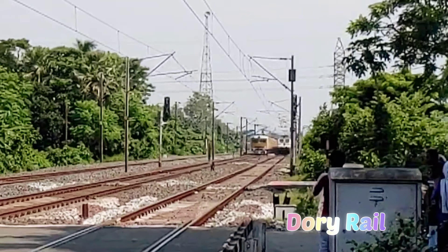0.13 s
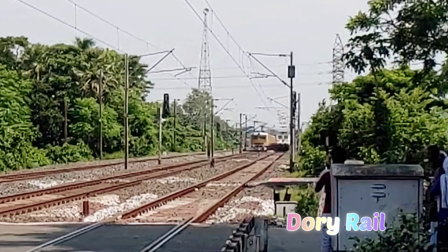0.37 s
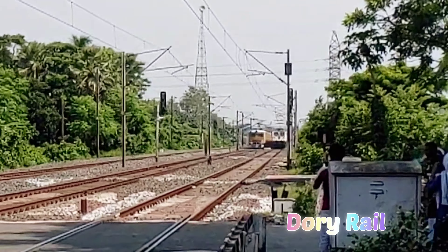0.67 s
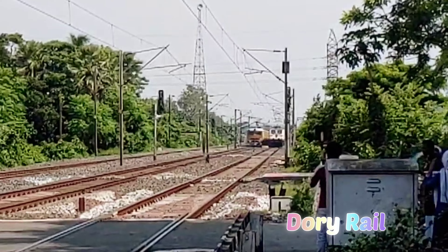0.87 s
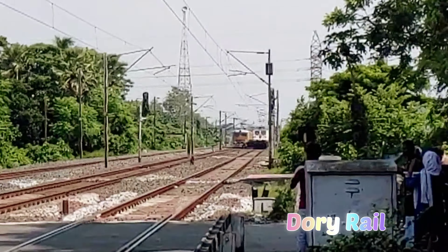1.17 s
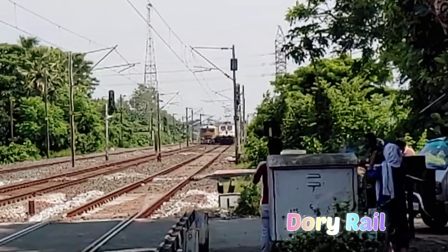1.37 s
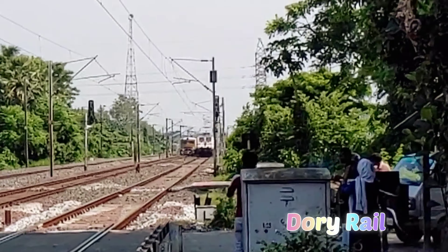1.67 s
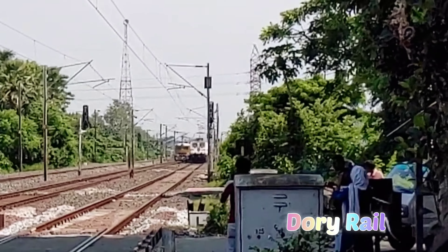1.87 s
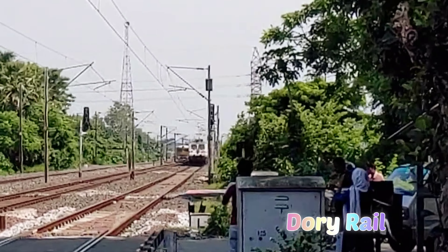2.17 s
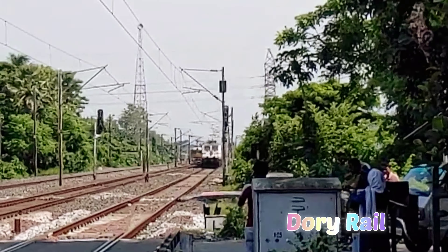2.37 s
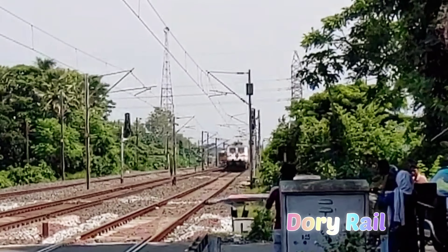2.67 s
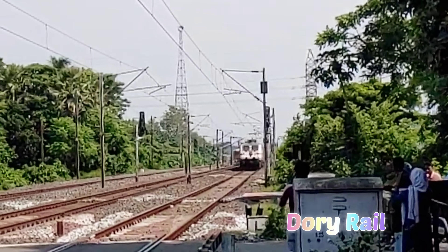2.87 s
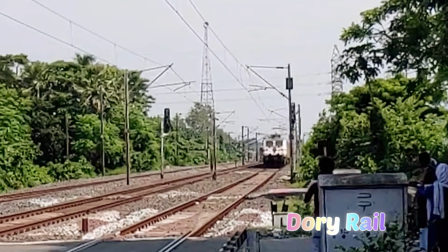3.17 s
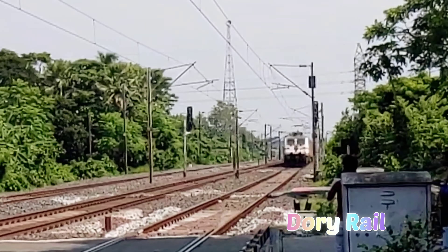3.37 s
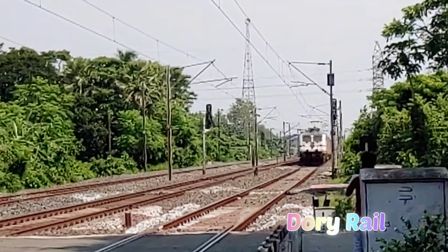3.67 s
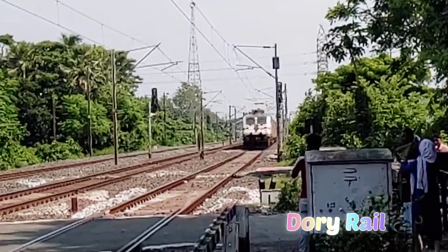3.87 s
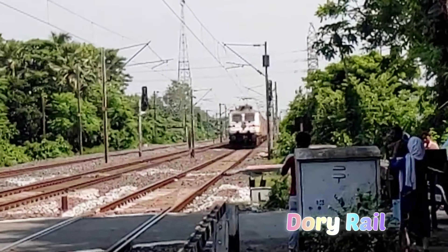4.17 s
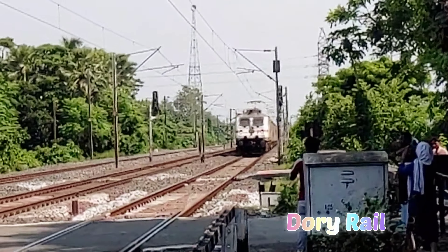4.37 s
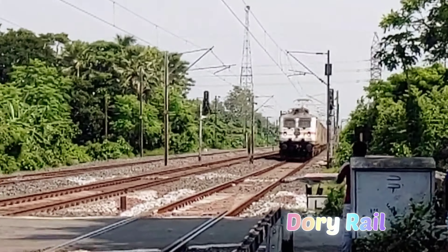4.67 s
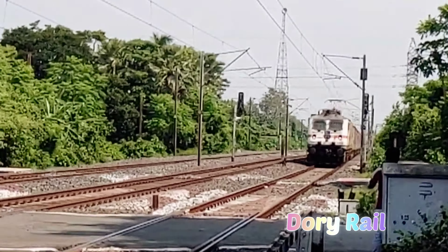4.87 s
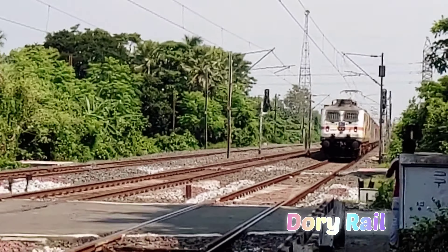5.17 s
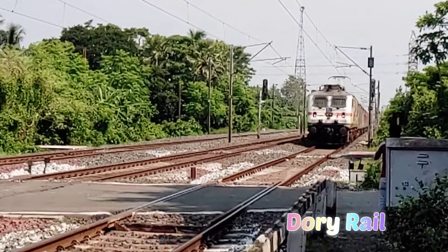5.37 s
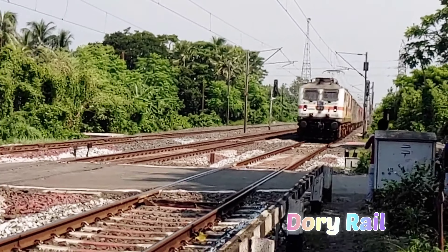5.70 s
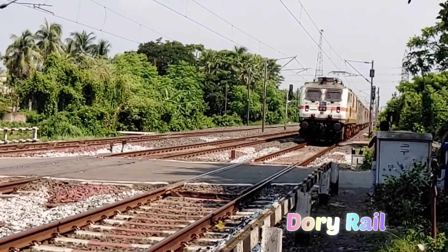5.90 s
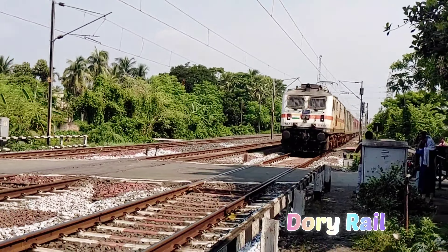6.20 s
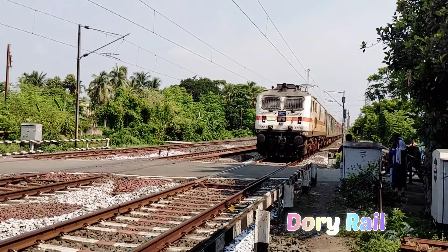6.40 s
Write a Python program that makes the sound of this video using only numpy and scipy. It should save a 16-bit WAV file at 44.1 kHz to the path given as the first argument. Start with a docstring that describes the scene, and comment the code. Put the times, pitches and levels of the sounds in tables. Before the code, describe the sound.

Outdoors by a railway crossing, wind buffets the microphone, mostly on the left, with small ticks and rustles close on the right. An approaching electric locomotive then sounds a long, loud, brassy horn blast, pauses briefly and sounds a second one. Underneath, low rumble, rolling wheels and a broad rush grow steadily as the train comes nearer.

```python
"""An electric locomotive's air horn sounds two long blasts as the train nears a level crossing.
The horn's pulse train reaches two microphone ports through unsteady air and off ballast and trees,
so its partials fade in and out. Rumble, wheel roll and rush grow over a faint far whine.
Before the horn, wind buffets the left port and something ticks and rustles near the right one."""
import sys
import numpy as np
from scipy import signal
from scipy.io import wavfile
from scipy.ndimage import uniform_filter1d, minimum_filter1d, map_coordinates

SR = 44100
rng = np.random.default_rng(int(sys.argv[2]) if len(sys.argv) > 2 else 0)


def bounce(signal):
    """Save signal as a 16-bit WAV file at the path given by the first command-line argument."""
    frames = np.transpose(np.atleast_2d(signal))
    limited = np.clip(frames, -1, 1)
    pcm = np.round(limited * 32767).astype(np.int16)
    wavfile.write(sys.argv[1], SR, pcm)


N = 288414

# horn, one table per blast: t/s, level/dB, dulling at partial 4/dB,
# then boost/dB for partial 2, partial 3, partials 4-6, treble (per half octave above 8 kHz)
HORN_BLASTS = [
    [(1.6, -10, 14, -15, -19, 0, -8), (1.66, -3, 0.5, -21, -12, -6.5, -6), (1.7, -1, -3, -10, -11, -4, -2),
     (1.85, -3, -5, -9.5, -6, -0.5, -2), (2.15, -2.5, -3.5, 2.5, -3, 5.5, 6),
     (2.5, -2, -4.5, 8.5, 2.5, 0.5, 6), (2.75, 0.5, -3.5, 5.5, 4, 3.5, 16),
     (3.0, 7.5, -4.5, 1, 3.5, -1, 0.5), (3.3, 7, -1, -4.5, -1, -0.5, 10.5),
     (3.46, -0.5, -4, 2, -2, -7.5, 10), (3.57, -4, -1, 4, -5, -1, -2), (3.72, -8, 8, 5, -1.5, 2.5, 2),
     (3.8, -3, 18, -0.5, -3, 4, -9), (3.89, -11, 24, -8.5, -3, 0, 0), (4.02, -16, 20, -8, -7, -2, 0)],
    [(4.468, -13, 23, 13, -4, 0, 0), (4.48, -9, 17, 5.5, -1, 3, 0), (4.499, -1, 2.5, 11, -6, 7, -10),
     (4.51, 9, 3.5, 7, -6, -1, -2), (4.524, 7, 0, 0, -2, 1, 2), (4.58, 4, -1, 0, 0.5, 1.5, 4),
     (4.7, 0, -1.5, 1, 0.5, 3, 6.5), (4.96, 1.5, 0.5, -6, 0.5, 1.5, 7), (5.3, 1, 0.5, -6.5, -1.5, 4.5, 6),
     (5.65, -2.5, 2, -3, 0.5, -1.5, 5.5), (5.95, -1, 0.5, -5.5, -2, 0.5, 0), (6.2, 1, 3, -8, -1, 0.5, 2),
     (6.54, 2.5, 1, 5, 5.5, -1, -1)],
]


def from_db(db):
    """Decibels to gain."""
    return 10 ** (np.asarray(db) / 20)


def unit_rms(x):
    """Scale to rms 1."""
    return x / np.sqrt(np.mean(np.abs(x) ** 2) + 1e-20)


def in_time(rows):
    """Table columns at every sample."""
    times_s, *columns = np.transpose(rows)
    return [np.interp(np.arange(N) / SR, times_s, c) for c in columns]


def at_hz(rows, hz):
    """Table columns at one frequency."""
    freqs_hz, *columns = np.transpose(rows)
    return [np.interp(np.log(hz), np.log(freqs_hz), c) for c in columns]


def pan(db):
    """Left and right gains for an L-R balance."""
    return from_db([[db / 2], [-db / 2]])


def wander(turns):
    """Smooth complex noise, spread about 1, one new value per turn."""
    knots = rng.standard_normal((2, 1200))
    real, imag = [map_coordinates(k, [turns], order=3, mode="wrap") for k in knots]
    return (real + 1j * imag) / np.sqrt(2)


def upsample(values, start=0, size=N):
    """From every 64th sample to every sample."""
    return np.interp(np.arange(start, size) / 64, np.arange(len(values)), values)


def band_noise(spectrum, flicker_db, flicker_hz=26.2, coherence=None, size=N):
    """Stereo noise of rms 1 in flickering half-octave bands."""
    port_coherence = [(60, 1), (180, 0.67), (550, 0.7), (1650, 0.32), (4970, 0.29), (15000, 0.077)]  # f/Hz, L-R correlation
    balance = [(60, .5), (250, 0), (900, -2.5), (3000, -2.5), (15000, -5)]  # f/Hz, L-R/dB
    edges_hz = 20 * 2 ** np.arange(0, 10.1, .5)
    t = np.arange(N // 64 + 2) * 64 / SR
    white = rng.standard_normal((2, 2, size))
    shared_drift = wander(flicker_hz / 3 * t).real
    out = 0
    for k, band_hz in enumerate(zip(edges_hz, edges_hz[1:])):
        hz = np.sqrt(np.prod(band_hz))
        if not spectrum[0][0] <= hz <= spectrum[-1][0]:
            continue
        mid, side = signal.sosfilt(signal.butter(2, band_hz, "band", fs=SR, output="sos"), white[k % 2])
        alike = at_hz(port_coherence, hz)[0] if coherence is None else coherence
        pair = np.sqrt(1 + alike) * mid + np.sqrt(1 - alike) * side * [[1], [-1]]
        drift_db = upsample(flicker_db * (shared_drift + wander(flicker_hz * t).real), size=size)
        out = out + from_db(at_hz(spectrum, hz)[0] + drift_db) * pair * pan(at_hz(balance, hz)[0])
    return unit_rms(out)


def swell(events, size):
    """Summed rise-hold-fall gains; 24.3 dB per rise or fall time."""
    t = np.arange(size) / SR
    gain = 0
    for start_s, hold_s, db, rise_s, fall_s in events:
        skirts = np.maximum(start_s - t, 0) / rise_s + np.maximum(t - start_s - hold_s, 0) / fall_s
        gain = gain + from_db(db - 24.3 * skirts)
    return gain


def distance_m(speed_m_s=30, arrival_s=7.85):
    """Range of the locomotive at every sample."""
    return speed_m_s * (arrival_s - np.arange(N) / SR)


def train():
    """Low rumble swelling with nearness, rolling wheels and a broad rush."""
    levels = [(0.0, -40, -37), (0.8, -46, -39), (1.5, -46.5, -33.5), (2.2, -55, -30), (3.1, -37, -20.5),
              (3.6, -39.5, -28.5), (4.3, -35, -28), (4.8, -33.5, -29), (5.4, -34.5, -27), (5.9, -35.5, -23),
              (6.54, -25.5, -20)]  # t/s, wheel roll/dB, rush/dB
    # spectra: f/Hz, relative density/dB
    rumble_spectrum = [(12, -39), (20, 0.5), (49, 5), (81, 0), (100, 4), (130, -30.5), (220, -120)]
    roll_spectrum = [(53, -23.5), (90, -11), (232, -9), (285, -11.5), (330, -0.5), (430, -22.5),
                     (730, -120)]
    rush_spectrum = [(120, -45), (200, -4), (288, -3), (517, -7), (599, 12.5), (802, 3.5), (1700, -1.5),
                     (2270, -5), (4640, -11.5), (5880, -18.5), (10200, -21.5), (15800, -32)]
    roll_db, rush_db = in_time(levels)
    nearness = (100 / distance_m()) ** .78
    rumble = from_db(-37) * nearness * band_noise(rumble_spectrum, flicker_db=2)
    roll = from_db(roll_db) * band_noise(roll_spectrum, flicker_db=4.5)
    rush = from_db(rush_db) * band_noise(rush_spectrum, flicker_db=.4)
    return rumble + roll + rush


def whine():
    """Faint wavering tones far off: noise through narrow resonances."""
    resonances = [(800.5, 28, -49.5), (522.6, 5.9, -52.5)]  # f/Hz, width/Hz, level/dB
    out = 0
    for hz, width_hz, db in resonances:
        b, a = signal.iirpeak(hz, hz / width_hz, fs=SR)
        tone = signal.lfilter(b, a, signal.lfilter(b, a, rng.standard_normal(N)))
        out = out + from_db(db) * unit_rms(tone)
    return out * pan(-3)


def wind(fall_s=.089, left_db=5, right_db=-22):
    """Gusts buffet the ports, mainly the left: lumpy low noise."""
    spectrum = [(12, -41), (20, -13), (53, 3.5), (130, 1.5), (248, -17), (348, -39), (500, -39), (650, -66),
                (1100, -120)]  # f/Hz, relative density/dB
    gusts = [(0.022, -55, .03), (0.27, -25, 0.16), (0.394, -28.5, 0.031), (0.561, -15.5, 0.031),
             (0.624, -13, 0.12), (0.71, -30, 0.083), (0.804, -25, 0.063), (0.922, -23.5, 0.055),
             (0.99, -31, 0.079), (1.105, -19, 0.047), (1.268, -25, 0.13), (1.342, -31, .06),
             (1.42, -31, 0.0246)]  # peak t/s, level/dB, rise/s
    size = round(1.7 * SR)
    noise = band_noise(spectrum, flicker_db=4, coherence=.14, size=size)
    envelope = swell([(s, 0, db, rise_s, fall_s) for s, db, rise_s in gusts], size)
    return np.pad(envelope * noise * from_db([[left_db], [right_db]]), ((0, 0), (0, N - size)))


def ticks(t60_s=.016, edge_hz=3600, size=3000):
    """Close ticks: fast-dying noise bursts, each a wide resonance plus a thin bright edge."""
    hits = [(0.2642, -25, 1130, -8, -12), (0.4105, -22, 1020, -5, -12), (0.431, -22.5, 1080, -2.5, -12),
            (0.7965, -24, 3160, -4.0, -12), (0.816, -15, 1160, -6.5, -17.5), (0.8384, -36, 1120, -2.5, -12),
            (0.8543, -33, 1420, -4.5, -8), (0.864, -22, 3320, -11, -12), (0.8947, -28, 4550, -4.5, -12),
            (0.9138, -32, 1080, -14, -3), (0.9686, -26, 1060, 1, -16), (1.2208, -21.5, 970, -13, -12),
            (1.297, -29, 3450, -16, -10), (1.3104, -16.5, 993, -4.0, -7), (1.3336, -19, 1130, -6, -12),
            (1.3578, -39, 4410, -2.5, -12), (1.3704, -25, 2030, -0.5, -13.5),
            (1.5738, -26.5, 2660, -3, -12), (1.585, -20, 1880, -2.5, -16), (3.914, -24.5, 1070, -21, -10.5)]  # t/s, level/dB, body f/Hz, L-R/dB, edge/dB
    out, t = np.zeros((2, N)), np.arange(size) / SR
    highpass = signal.butter(2, edge_hz, "high", fs=SR, output="sos")
    for start_s, db, body_hz, pan_db, edge_db in hits:
        burst = rng.standard_normal((2, size))
        burst = burst + .5 * burst[:, ::-1][::-1, ::-1]  # each port gets some of the other's noise
        body = unit_rms(signal.lfilter(*signal.iirpeak(body_hz, Q=1.2, fs=SR), burst))
        edge = from_db(edge_db) * unit_rms(signal.sosfilt(highpass, burst))
        i = round(start_s * SR)
        out[:, i:i + size] += from_db(db - 60 * t / t60_s) * (body + edge) * pan(pan_db)
    return out


def rustle(rise_s=.0047, fall_s=.059):
    """Close rustling: bright noise in quick uneven patches."""
    spectrum = [(240, -37), (400, -10.5), (1140, -13), (2040, -16), (3440, -11), (3830, -9), (4470, -12.5),
                (5380, -24.5), (10700, -16.5), (15800, -33)]  # f/Hz, relative density/dB
    patches = [(0.407, 0.013, -43), (0.645, 0.13, -40), (0.804, 0.013, -23.5), (0.848, 0.039, -28.5),
               (1.29, 0.063, -30), (1.513, 0.101, -41)]  # t/s, hold/s, level/dB
    size = round(1.7 * SR)
    noise = band_noise(spectrum, flicker_db=6, flicker_hz=151.3, coherence=.13, size=size)
    envelope = swell([(*patch, rise_s, fall_s) for patch in patches], size)
    return np.pad(envelope * noise, ((0, 0), (0, N - size)))


def horn_pitch_hz(creep_hz_s=30, max_creep_hz=9):
    """Each blast speaks sharp and settles; the first creeps up as its air runs out."""
    held_pitch = [(1.6, 357.4), (2.15, 357.2), (2.28, 356.5), (2.55, 357.6), (2.78, 358), (3.15, 357.5),
                  (3.35, 357.1), (3.55, 357.5), (4.53, 359), (4.75, 356.1), (4.9, 357.5), (5.45, 357),
                  (5.6, 356.2), (5.8, 357.1), (5.95, 357.4), (6.25, 356.9)]  # t/s, f/Hz
    bends = [(1.6, 11, .06, 1, 3.55), (4.46, 42, .052, 6, 7)]  # onset/s, sharp by/Hz, settling/s, settling exponent, valve closes/s
    t = np.arange(N) / SR
    pitch_hz, = in_time(held_pitch)
    for (onset_s, sharp_hz, settle_s, power, close_s), until_s in zip(bends, (bends[1][0], np.inf)):
        onset_hz = sharp_hz * np.exp(-np.abs((t - onset_s) / settle_s) ** power)
        creep_hz = np.clip((t - close_s) * creep_hz_s, 0, max_creep_hz)
        pitch_hz += (onset_hz + creep_hz) * (t >= onset_s) * (t < until_s)
    return pitch_hz


def horn_gate(attack_s=.012, catch_s=4.5012, catch_width_s=.003, catch_depth=.85):
    """The air opens twice; the diaphragm catches once as the second blast starts."""
    t = np.arange(N) / SR
    first, second = HORN_BLASTS
    first_on = np.clip((t - first[0][0]) / attack_s, 0, 1) * (t < first[-1][0])
    second_on = np.clip((t - second[0][0]) / attack_s, 0, 1)
    catch = catch_depth * np.exp(-((t - catch_s) / catch_width_s) ** 2)
    return (first_on + second_on) * (1 - catch)


def horn_bell(orders, hz, resonance_hz=1020):
    """Complex gain per partial: the bell shapes the levels and turns the phase above its resonance."""
    response = [(790, -31), (1350, -17.5), (1860, -8.5), (2190, -16.5), (2610, -10.5), (3620, -14.5),
                (5090, -12), (5820, -17), (6930, -15), (7520, -19.5), (8690, -27.5), (10100, -19.5),
                (11800, -25.5), (13000, -22), (15800, -18)]  # shape within a group of partials: f/Hz, level/dB
    group_tops = [1, 2, 3, 4, 5, 6, 22]  # highest partial of each group; the rest form a last group
    group_db = [-20.5, -15, -9.5, -18.5, -18, -20.5, -17.5, -16]  # each group at full pressure: level/dB
    group = np.searchsorted(group_tops, orders)
    shape = from_db(at_hz(response, hz)[0])
    group_norm = np.sqrt([np.sum(shape[group == g] ** 2) for g in group])
    phase_rad = -3.8 * np.arctan((hz / resonance_hz) ** 2)
    return shape / group_norm * from_db(group_db)[group] * np.exp(1j * phase_rad)


def ground_gain(hz, range_m, horn_height_m=4.09, port_height_m=1.616, rough_hz=1440):
    """Direct sound beats with its reflection; ballast mirrors low partials best."""
    delay_s = 2 * horn_height_m * port_height_m / range_m / 343
    return np.abs(1 - .83 * np.exp(-hz / rough_hz - 2j * np.pi * hz * delay_s))


def horn(nominal_hz=357.2, flutter_hz=26, rasp_hz=120, neighbour_corr=.65):
    """A pulse train as a stack of partials, each arriving direct, off the ground and scattered."""
    scatter = [(350, -14, -8, -16), (720, -14, -3, -20), (1070, -19, -9, -23), (2200, -10, -6, -17),
               (2600, -1, -3, -14), (4000, 2, 1, -12), (8000, 3, -1, -7), (14000, 3, -2, -4)]  # f/Hz, scattered share/dB, part opposed between ports/dB, flutter/dB
    balance = [(350, 1), (720, -2.5), (1070, -.6), (2000, 1.5), (4000, -1.7), (9000, -4.4), (15000, -4)]  # f/Hz, L-R/dB
    start = round(HORN_BLASTS[0][0][0] * SR)
    controls = [c[::64] for c in in_time(np.vstack(HORN_BLASTS))]
    level_db, dull_db, second_db, third_db, brass_db, treble_db = controls
    t, range_m = np.arange(0, N, 64) / SR, distance_m()[::64]
    ragged = from_db(7 + .89 * 20 * np.log10(100 / range_m) + .27 * dull_db)  # more when weakly blown
    fade_turns = np.cumsum(6 * np.sqrt(100 / range_m)) * 64 / SR  # 6 fades/s at 1 kHz and 100 m
    fundamental = np.exp(2j * np.pi * np.cumsum(horn_pitch_hz()[start:]) / SR)
    orders = np.arange(1, 45)
    partials_hz = orders * nominal_hz
    out, wave, fading = np.zeros((2, N)), 1, 0
    for k, hz, bell in zip(orders, partials_hz, horn_bell(orders, partials_hz)):
        wave = wave * fundamental
        turns = fade_turns * (hz / 1000) ** .4  # short waves fade faster
        flutters = [wander(flutter_hz * t) + from_db(-1) * wander(rasp_hz * t) for _ in range(2)]
        fresh = np.array([wander(turns), wander(turns), *flutters])
        fading = neighbour_corr * fading + np.sqrt(1 - neighbour_corr ** 2) * fresh
        shared_fade, opposed_fade, *port_flutter = fading
        scattered, opposed, flutter = from_db(at_hz(scatter, hz))
        common = (ground_gain(hz, range_m) + scattered * shared_fade) / np.sqrt(1 + scattered ** 2)
        db = level_db - dull_db * np.log2(max(k / 2, 1)) ** .65
        db += second_db * (k == 2) + third_db * (k == 3) + brass_db * (k in (4, 5, 6))
        db += treble_db * np.clip(2 * np.log2(hz / 8000), 0, 2)
        db -= .1641 * range_m * (hz / 1e4) ** 2  # air loss, dB/m at 10 kHz
        gains = bell * from_db(db) * pan(at_hz(balance, hz)[0])
        for port, sign in enumerate((1, -1)):
            path = common + sign * opposed * opposed_fade + flutter * ragged * port_flutter[port]
            out[port, start:] -= (upsample(path * gains[port], start=start) * wave).real
    return np.sqrt(2) * horn_gate() * out


def scene():
    """All sources at the two ports."""
    return horn() + train() + whine() + wind() + ticks() + rustle()


def duck_bass(x, bass_hz=118, bright_hz=900, knee_db=-16.5, slope=1.3, max_db=9, window_s=.053):
    """The recorder turns the bass down under loud bright sound."""
    bass = signal.sosfiltfilt(signal.butter(2, bass_hz, fs=SR, output="sos"), x)
    bright = signal.sosfilt(signal.butter(4, bright_hz, "high", fs=SR, output="sos"), x)
    power = uniform_filter1d(np.mean(bright ** 2, axis=0), size=round(window_s * SR))
    cut_db = np.clip(slope * (10 * np.log10(power + 1e-12) - knee_db), 0, max_db)
    return x - bass * (1 - from_db(-cut_db))


def record(dry, left_lag_samples=2, low_cut_hz=30, high_cut_hz=15850, limit=1.4, ceiling=.97):
    """Left port lag, low cut, bass ducking, look-ahead limiter, soft ceiling, high cut."""
    x = np.array([np.pad(dry[0], (left_lag_samples, 0))[:N], dry[1]])
    x = signal.sosfilt(signal.butter(2, low_cut_hz, "high", fs=SR, output="sos"), x)
    x = duck_bass(x)
    limiter_gain = np.minimum(1, limit / (np.abs(x).max(axis=0) + 1e-9))
    x = x * uniform_filter1d(minimum_filter1d(limiter_gain, size=400), size=200)
    x = x / (1 + np.abs(x / ceiling) ** 5) ** (1 / 5)
    return signal.sosfilt(signal.ellip(12, .3, 75, high_cut_hz, fs=SR, output="sos"), x)


dry = scene()
out = record(dry)
bounce(out)
```